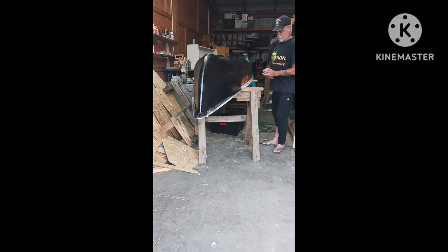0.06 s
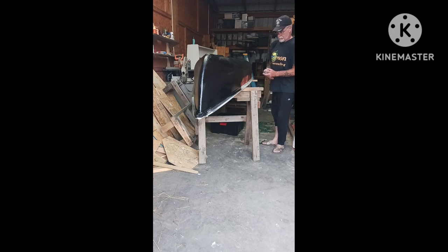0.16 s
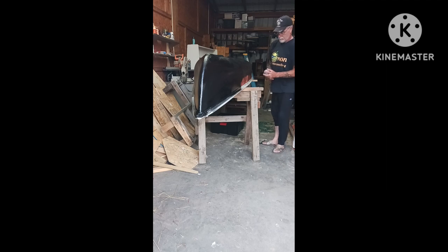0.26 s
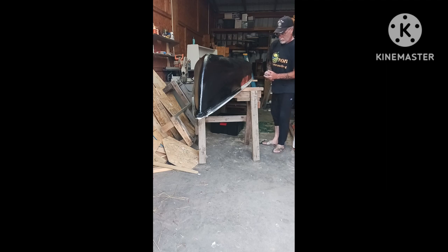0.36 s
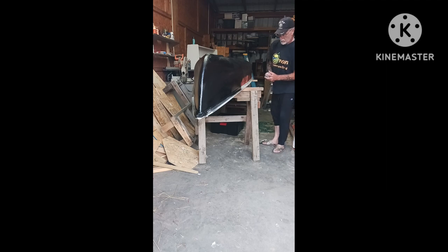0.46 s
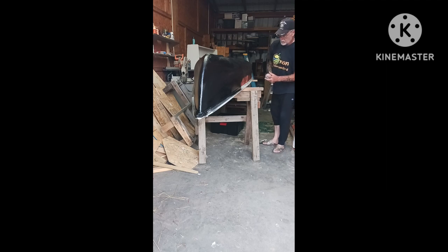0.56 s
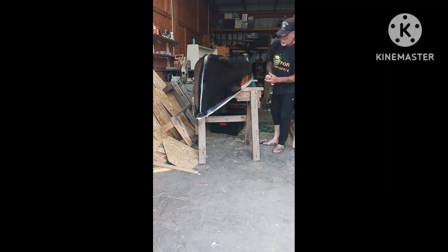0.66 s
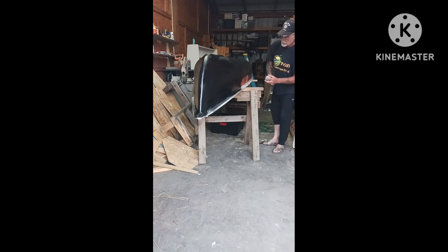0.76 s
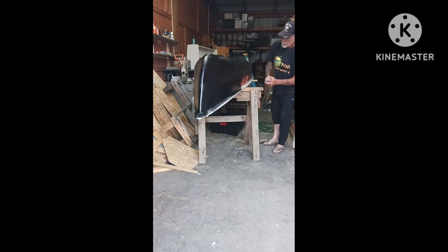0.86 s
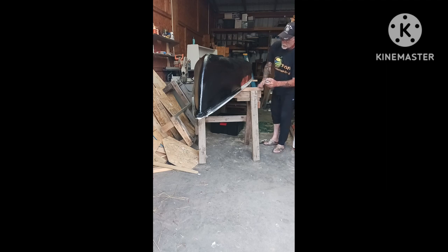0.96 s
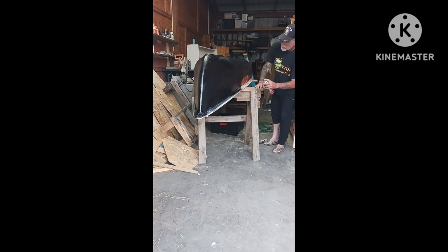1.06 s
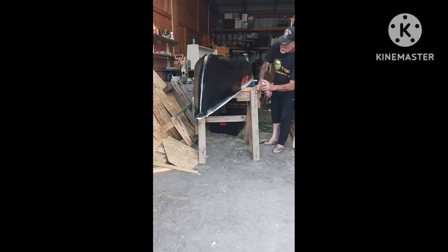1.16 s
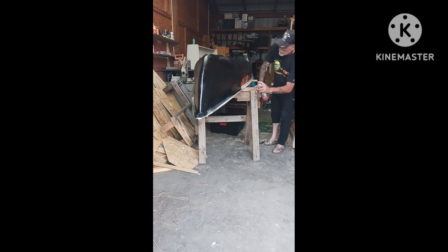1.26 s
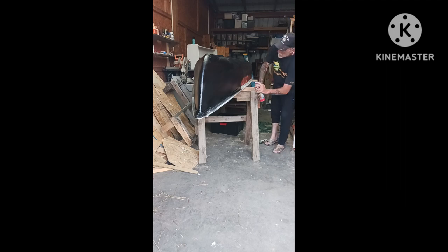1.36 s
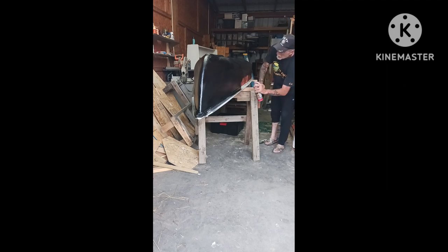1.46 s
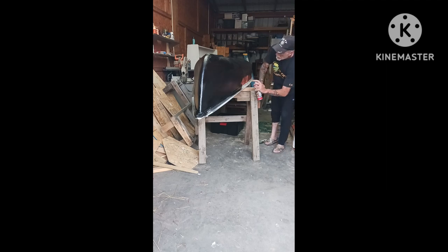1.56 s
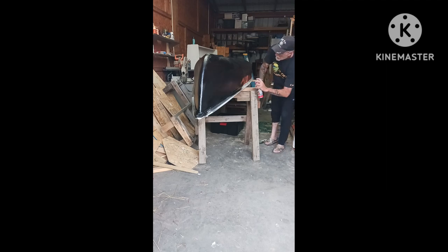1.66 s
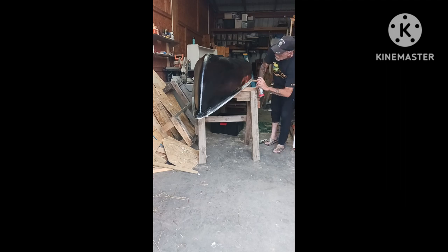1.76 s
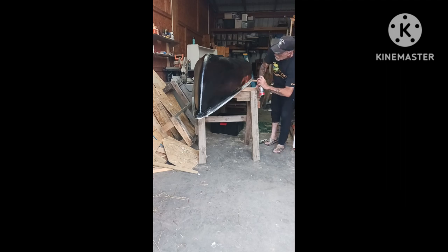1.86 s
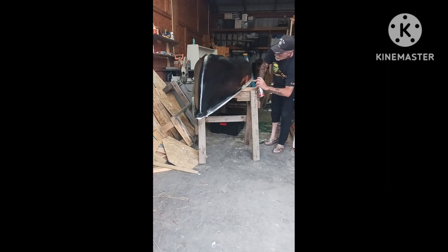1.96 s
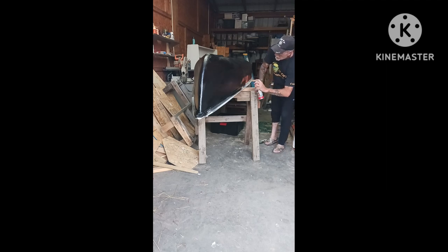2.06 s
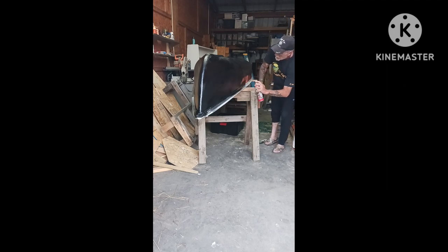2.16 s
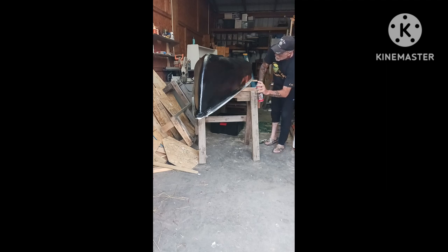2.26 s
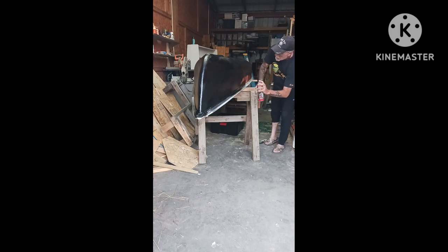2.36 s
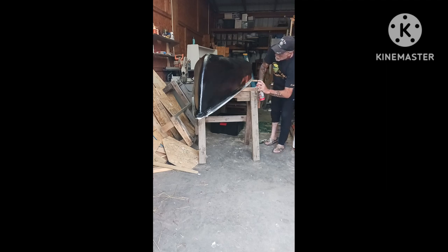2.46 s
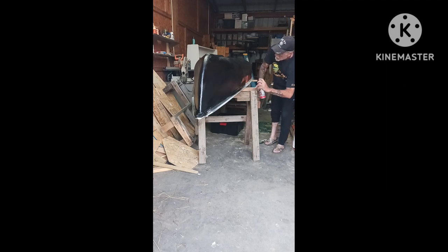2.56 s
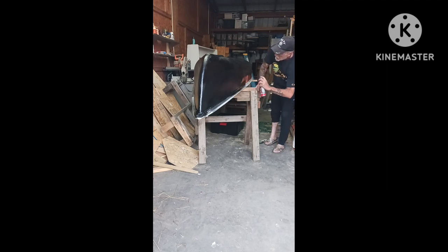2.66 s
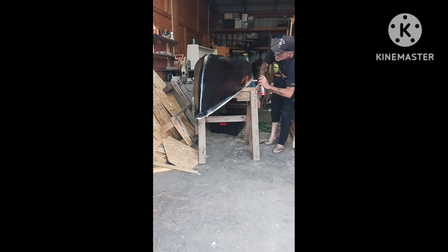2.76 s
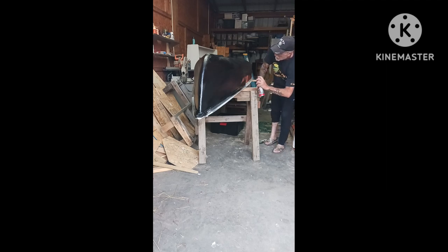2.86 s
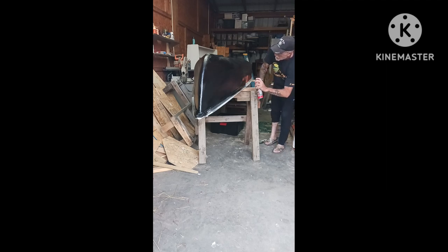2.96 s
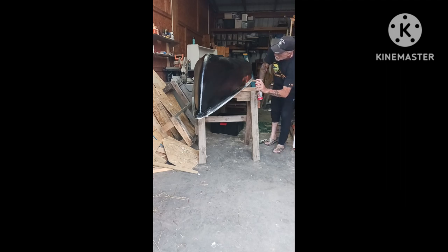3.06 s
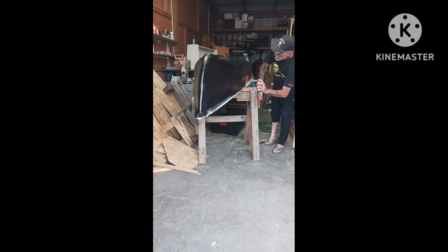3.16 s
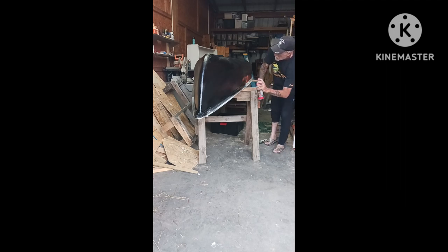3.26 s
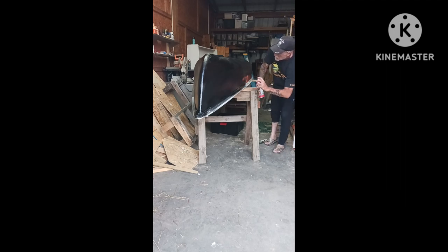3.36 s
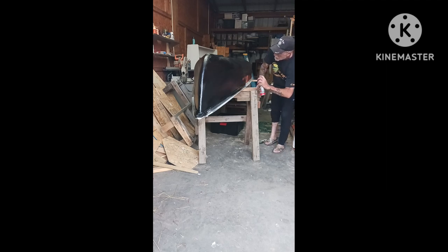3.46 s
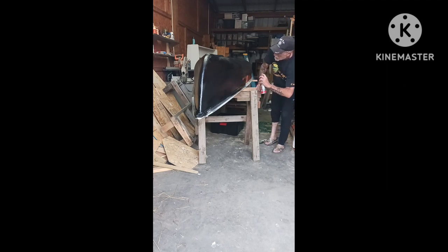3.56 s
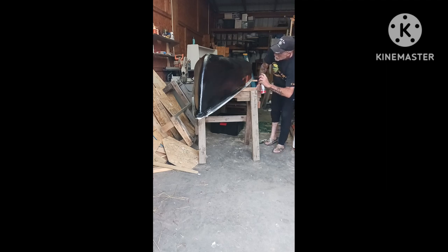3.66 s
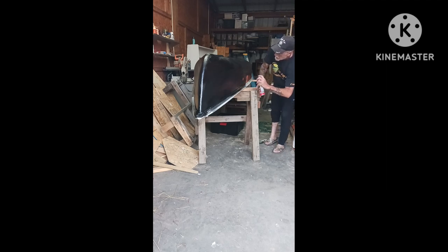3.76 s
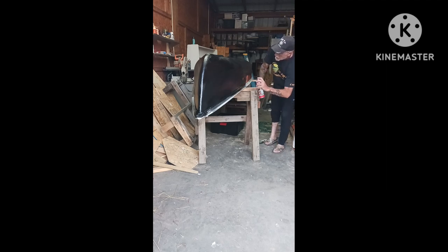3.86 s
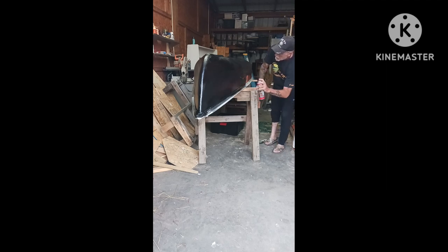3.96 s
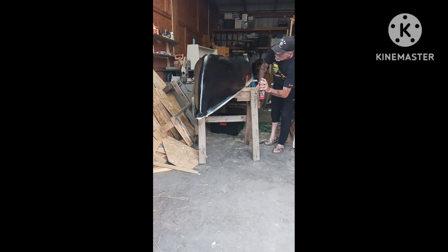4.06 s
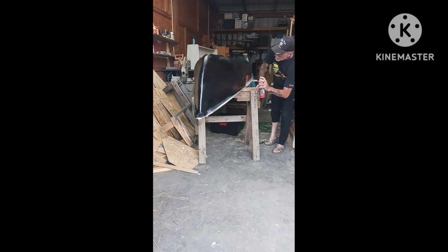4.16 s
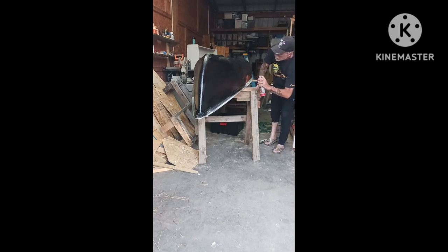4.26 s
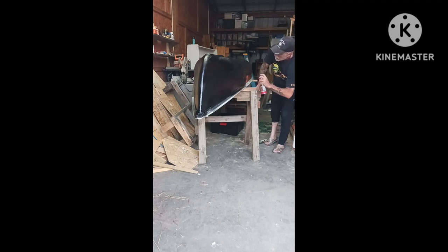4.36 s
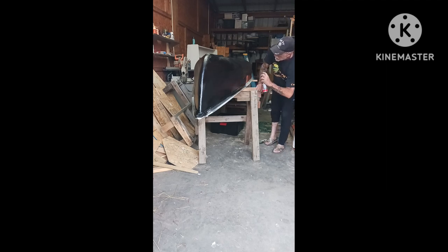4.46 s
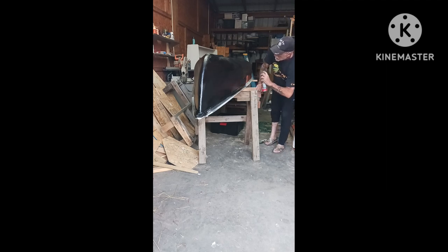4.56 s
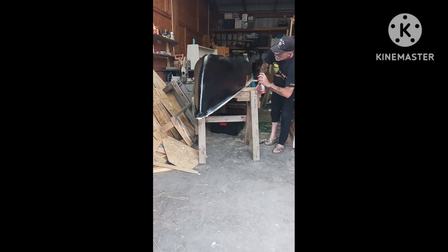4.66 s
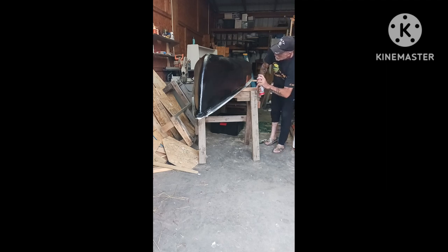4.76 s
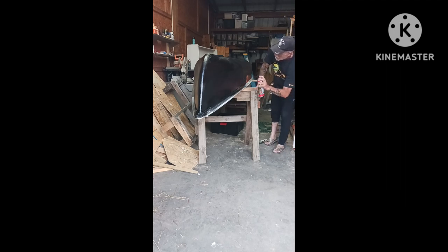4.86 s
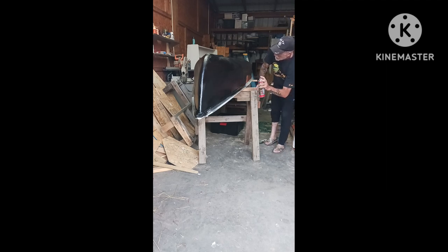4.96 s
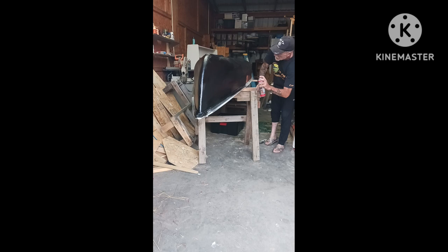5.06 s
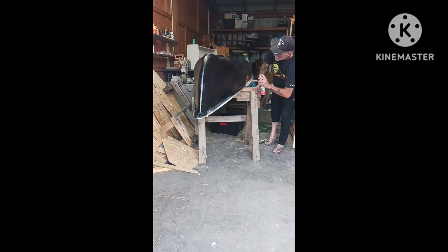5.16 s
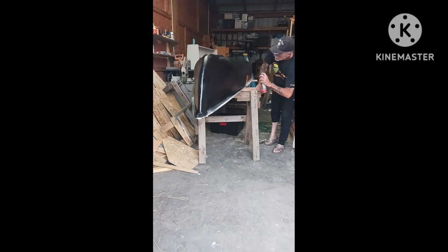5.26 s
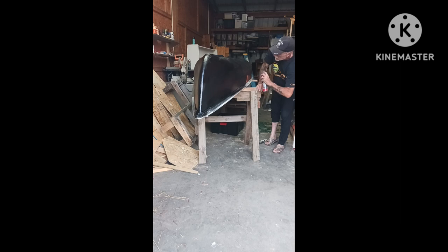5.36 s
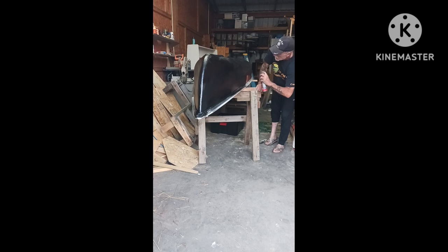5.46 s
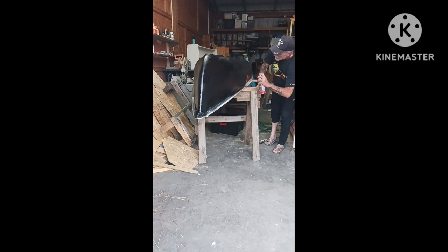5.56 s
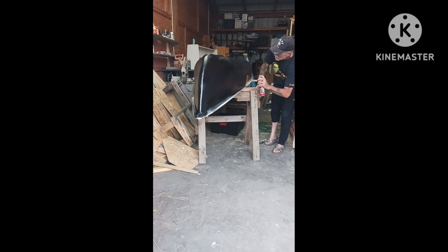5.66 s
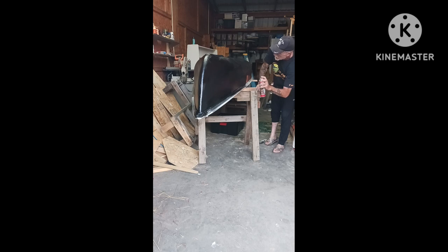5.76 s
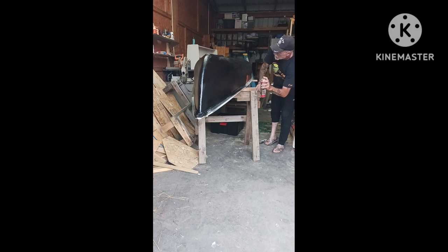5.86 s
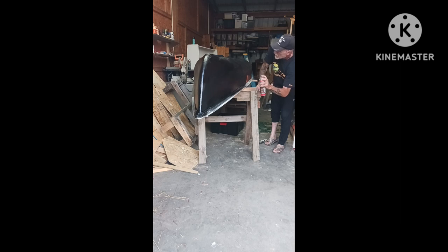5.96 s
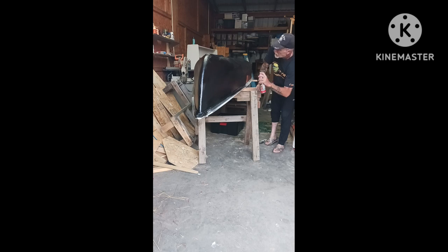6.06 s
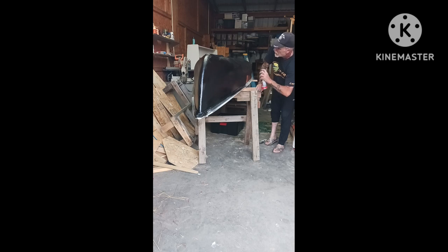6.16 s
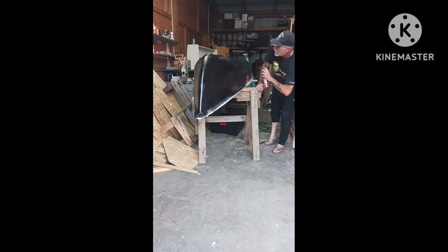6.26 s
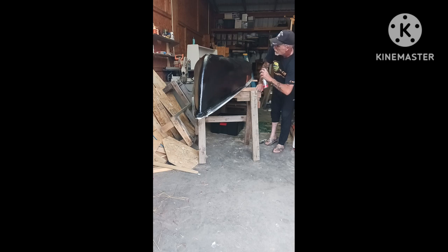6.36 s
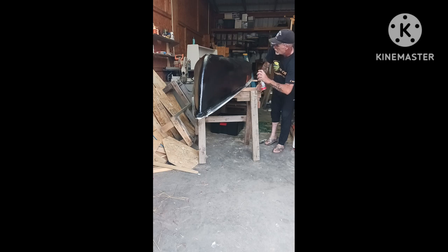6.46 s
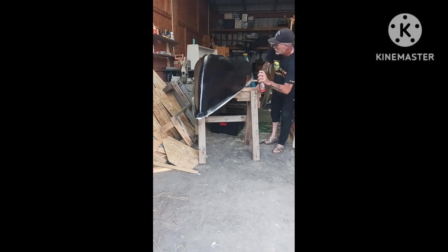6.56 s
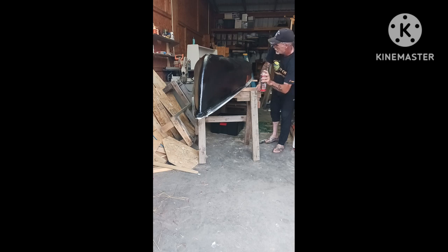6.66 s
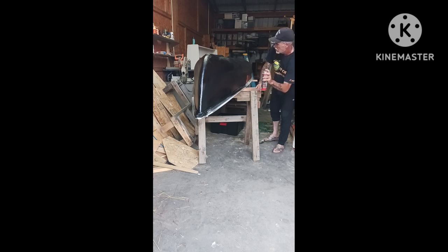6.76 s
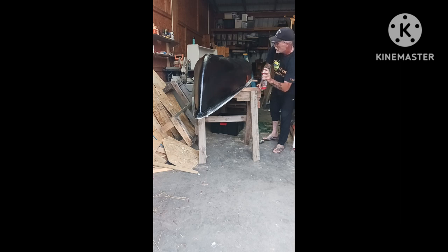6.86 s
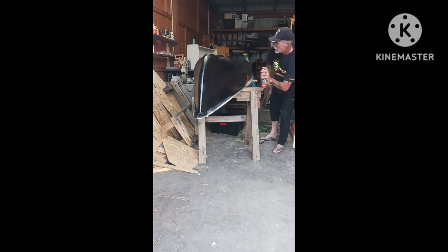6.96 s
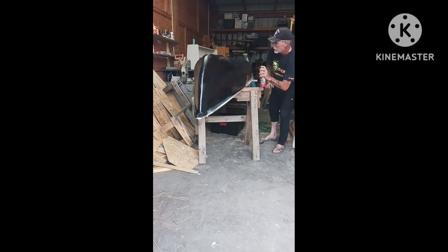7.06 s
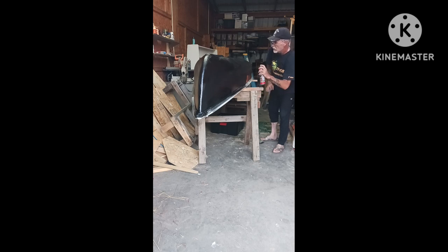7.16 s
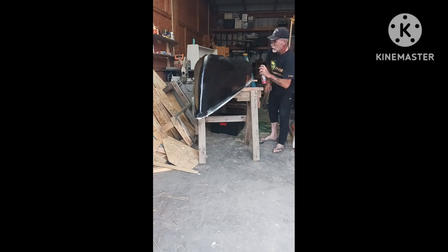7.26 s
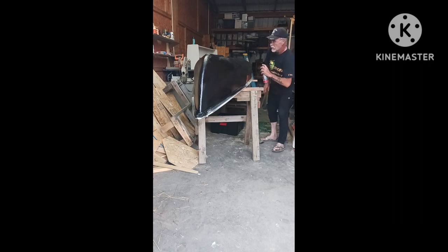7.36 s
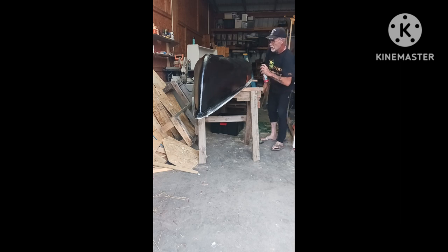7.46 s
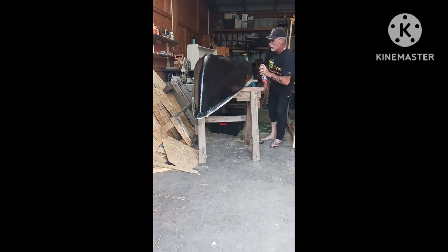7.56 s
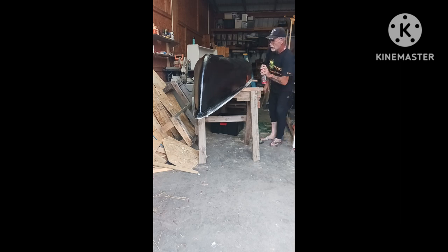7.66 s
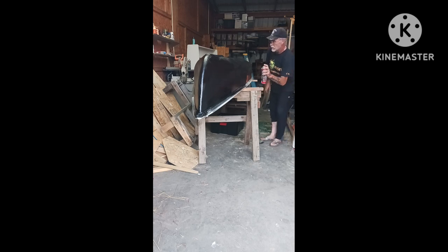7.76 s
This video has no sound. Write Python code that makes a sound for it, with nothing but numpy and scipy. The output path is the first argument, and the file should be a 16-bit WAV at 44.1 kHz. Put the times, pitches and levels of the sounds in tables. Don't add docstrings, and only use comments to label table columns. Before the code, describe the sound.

A timber workshop with a short, soft reverberation, heard in stereo from a few metres. At 0.1 s a sandal scuffs strongly on gritty concrete; from 0.5 to 1.1 s the sole drags quietly over sand, with dry little cracks. After a brief pause, an aerosol can starts at 1.5 s: a sharp-edged, very bright hiss lasting about 0.3 s, with the midrange rush of droplets hitting a hull. Bursts repeat about every 0.45 s, with clean gaps, alternating between strokes that start stronger and fade and strokes that grow. The rhythm runs until 6.7 s, pauses, then resumes at 7.1 and 7.5 s, with a faint scuff at 7.5 and a slower one at 7.7. Beneath everything, a far engine hums very low near 60 Hz, swelling unevenly and fuller around 1.6 s and after 5.5 s, with muffled traffic wash and faint airy room noise.

```python
import sys
import numpy as np
from scipy import signal
from scipy.fft import rfft, irfft, next_fast_len
from scipy.io import wavfile
from scipy.ndimage import uniform_filter1d, map_coordinates

SR = 44100
rng = np.random.default_rng(int(sys.argv[2]) if len(sys.argv) > 2 else 0)


def gain_from_db(level_db):
    decades = np.asarray(level_db, float) / 20
    return 10 ** decades


def file_out(sig):
    cols = np.atleast_2d(sig).T
    lim = np.clip(cols, -1, 1)
    pcm = np.round(lim * 32767).astype(np.int16)
    wavfile.write(sys.argv[1], SR, pcm)


N = 344862

# f/Hz, level/dB [per Hz]
AIR_SPECTRUM = [(20, -41), (42, -15), (64, -10.5), (129, -24), (433, -20), (620, -27.5), (1500, -28.5),
                (2200, -38), (2800, -32.5), (3500, -26.5), (6800, -25), (8300, -38), (11000, -55.5),
                (15500, -36)]
# f/Hz, coherence/1
AIR_COHERENCE = [(60, 0.71), (150, 1), (380, 0.99), (950, 0.5), (2380, 0.61), (5980, -0.33), (15000, -1.15)]
# f/Hz, level/dB
AIR_PORTS = [(60, 5), (130, 5), (290, 2), (640, 2.5), (1410, 4), (3100, 3.5), (6820, -5), (15000, 3)]
# f/Hz, level/dB [per Hz]
TRAFFIC_SPECTRUM = [(30, -40), (60, 3), (130, -2), (400, -15.5), (700, -28)]
# t/s [loudest], half width/s, level/dB, f/Hz [firing pitch]
ENGINE_SWELLS = [(0.08, .22, -53, 55.5), (.55, .05, -51.5, 57), (.76, .045, -49, 57.5),
                 (.95, .08, -54, 57.4), (1.12, .04, -54, 58), (1.36, .12, -57, 58.6),
                 (1.6, .085, -40, 58.7), (1.87, .05, -46, 59.7), (2.1, .07, -56, 59.3),
                 (2.4, .16, -58, 64.7), (2.67, .06, -52, 65.1), (3.01, .05, -53, 65.8),
                 (3.17, .04, -56, 65.4), (3.87, .05, -56, 58.8), (4.15, .14, -58, 59.5),
                 (4.43, .03, -53, 62.4), (4.92, .08, -52, 62.4), (5.13, .1, -48.5, 61.1),
                 (5.58, .1, -46, 59.7), (5.87, .19, -39.5, 59.6), (6.25, .22, -43, 60),
                 (6.64, .25, -39.5, 59.8), (7.1, .2, -46, 60), (7.39, .14, -42, 58.8),
                 (7.73, .05, -47, 59.5)]
# f/Hz, bandwidth/Hz, level/dB
MACHINE_TONES = [(137.2, 6.5, -68.5), (184, 3.2, -72)]
# t/s [loudest], rise/s [per 20 dB], fall/s [per 20 dB], level/dB
SCUFFS = [
    (.126, .06, .04, -37.5),
    (7.485, .03, .06, -50),
    (7.716, .12, .06, -44.5),
]
# t/s [loudest], rise/s [per 20 dB], fall/s [per 20 dB], level/dB
DRAGS = [
    (.5, .03, .03, -67),
    (.547, .006, .012, -52),
    (.615, .09, .6, -60.5),
    (.882, .35, .17, -57),
    (.974, .012, .33, -58.5),
]
# t/s, level/dB [peak], f/Hz [ring]
GRIT_CRACKS = [
    (0.4953, -47, 3640),
    (0.5452, -40, 3660),
    (0.607, -45, 3460),
    (0.6594, -40, 3320),
    (0.8094, -41, 3650),
    (0.8748, -37.5, 3150),
    (0.9074, -44, 3540),
    (0.9738, -38.5, 3960),
    (1.064, -44, 3470),
]
# f/Hz, level/dB [per Hz]
SOLE_SPECTRUM = [(600, -60), (950, -35), (1200, -16), (1850, -10), (2650, -6.5), (3500, -10), (5000, -15),
                 (7300, -16.5), (11000, -16), (15500, -20.5)]
# f/Hz, level/dB [per Hz]
DRAG_SPECTRUM = [(530, -46), (900, -24), (1230, -6), (1610, -7), (3340, 0), (4710, -8.5), (10600, -14.5),
                 (13400, -12), (15500, -24)]
# t/s [start], length/s, level/dB [hiss at first],
# level/dB [hiss after the wrist has turned], f/Hz [brightest lobe of the jet]
PRESSES = [(1.535, .327, -34.5, -40, 13600), (1.998, .289, -41.5, -38.5, 13500),
           (2.469, .295, -39.5, -40, 14200), (2.9, .27, -42, -38, 13700), (3.325, .297, -39, -40.5, 13900),
           (3.769, .284, -41.5, -38, 14100), (4.232, .301, -38.5, -41.5, 13900),
           (4.673, .273, -42, -38.5, 13700), (5.125, .295, -37.5, -40.5, 13500),
           (5.568, .279, -41, -37.5, 13600), (6.011, .268, -37.5, -40.5, 13500),
           (6.433, .239, -42, -39, 13300), (7.062, .332, -39, -41.5, 13000),
           (7.532, .265, -42.5, -39.5, 13400)]
# f/Hz, level/dB [per Hz]
JET_SPECTRUM = [(4500, -34), (5800, -8), (6900, -5.5), (8500, -6.5), (10000, -8), (11500, -2), (13200, 2.5),
                (14200, 0), (15400, 4), (17000, 0.5)]
# f/Hz, level/dB [per Hz]
SPLASH_SPECTRUM = [(500, -37), (1000, -25), (1800, -14), (2250, -13), (2600, -7.5), (3000, -6.5),
                   (3600, -0.5), (4300, -4.5), (5100, -10), (5600, -15.5), (7000, -17)]
# f/Hz, t60/s
SHED_T60 = [(1000, 0.5), (3500, 0.28), (8000, 0.24), (14000, 0.2)]
# f/Hz, level/dB
NEAR_PORTS = [(700, 10), (1500, 0.5), (3300, -1.5), (5200, -0.5), (5800, -11), (6800, -5), (7600, -0.5),
              (10000, 6.5), (11700, 4.5), (13200, 3.5), (14200, 0), (15500, 5)]


def evened(x):
    return x / np.sqrt(np.mean(x ** 2) + 1e-20)


def read_table(points, hz):
    f, value = np.transpose(points)
    return np.interp(np.log(hz + 1), np.log(f + 1), value)


def colour(x, points, share=1):
    size = next_fast_len(x.shape[-1])
    response_db = read_table(points, np.fft.rfftfreq(size, 1 / SR))
    return irfft(rfft(x, size) * gain_from_db(share * response_db), size)[..., :x.shape[-1]]


def wander(hz):
    low_pass = signal.butter(2, hz, fs=SR, output="sos")
    return evened(signal.sosfilt(low_pass, rng.standard_normal(N)))


def air():
    wash_db = -54.5
    frames, hz = N // 256 + 5, np.fft.rfftfreq(1024, 1 / SR)
    a, b, c, d, patches = rng.standard_normal((frames, 513, 5)).T
    patches = evened(uniform_filter1d(uniform_filter1d(patches, 10, 0), 16, 1))
    same = np.clip(read_table(AIR_COHERENCE, hz), -1, 1)[:, None]
    left = a + 1j * b
    right = same * left + np.sqrt(1 - same ** 2) * (c + 1j * d)
    z = np.array([left, right]) * gain_from_db(1.05 * patches)
    noise = signal.istft(z, nperseg=1024, noverlap=768)[1][:, :N]
    wash = gain_from_db(wash_db) * evened(colour(noise, AIR_SPECTRUM))
    return np.array([colour(wash[0], AIR_PORTS, 0.83), colour(wash[1], AIR_PORTS, -0.73)])


def engine_db():
    lull_db = -73
    t = np.linspace(0, N / SR, num=2000)
    power = sum(gain_from_db(db) ** 2 * np.exp(-((t - s) / width) ** 2) for s, width, db, _ in ENGINE_SWELLS)
    return np.interp(np.arange(N) / SR, t, 10 * np.log10(power + gain_from_db(lull_db) ** 2))


def traffic():
    level_db, follows, drift_db = -60.5, .33, .6
    wash = rng.standard_normal(N) + 0.56 * rng.standard_normal((2, N))
    wash = evened(colour(wash, TRAFFIC_SPECTRUM))
    return gain_from_db(level_db + follows * (engine_db() + 55) + drift_db * wander(1.5)) * wash


def drone():
    s, _, _, hz = np.transpose(ENGINE_SWELLS)
    t = np.arange(N) / SR
    turns = np.cumsum(np.interp(t, s, hz) + 0.58 * wander(3.15)) / SR
    level = gain_from_db(engine_db())
    out = np.sqrt(2) * level * gain_from_db(0.44 * wander(6.9)) * np.sin(2 * np.pi * turns)
    for tone_hz, width_hz, tone_db in MACHINE_TONES:
        in_phase = wander(width_hz) * np.cos(2 * np.pi * tone_hz * t)
        quadrature = wander(width_hz) * np.sin(2 * np.pi * tone_hz * t)
        out += gain_from_db(tone_db) * (in_phase + quadrature)
    return out + gain_from_db(-8.5) * np.outer([1, -1], level * np.cos(2 * np.pi * turns))


def ports(x, lag_s):
    return np.array([x, map_coordinates(x, [np.arange(N) - lag_s * SR], order=3)])


def slides(rows):
    t = np.arange(N) / SR
    power = sum(gain_from_db(db - 20 * np.maximum((s - t) / rise, (t - s) / fall)) ** 2 for s, rise, fall, db in rows)
    return np.sqrt(power)


def sandals():
    sizes = gain_from_db(3.0 * np.minimum(rng.exponential(1, N), 5))
    struck = rng.random(N) < 2500 / SR
    grains = sizes * struck * rng.choice([-1, 1], N)
    grains = evened(grains) + 1.7 * rng.standard_normal(N)
    scuff = slides(SCUFFS) * evened(colour(grains, SOLE_SPECTRUM))
    drag = slides(DRAGS) * evened(colour(grains, DRAG_SPECTRUM))
    source = gain_from_db(5.5 + 0.92 * wander(46)) * (scuff + drag)
    t = np.arange(400) / SR
    for s, peak_db, hz in GRIT_CRACKS:
        crack = np.diff(rng.standard_normal(len(t) + 1)) * gain_from_db(-60 * t / .006)
        ring = np.sin(2 * np.pi * hz * t) * gain_from_db(-60 * t / 0.011)
        source[round(s * SR):][:len(t)] += gain_from_db(peak_db) * (ring + crack)
    return gain_from_db(-1.0) * ports(source, .00004), gain_from_db(-3.5) * source


def shed(x, count=4, drift_hz=6.9):
    taps = np.zeros((count, 2, SR // 4))
    at = np.arange(160, SR // 4 - 12, 12)
    at = at + rng.integers(0, 12, (count, 2, len(at)))
    np.put_along_axis(taps, at, rng.choice([-1., 1.], at.shape), 2)
    hz, t, z = signal.stft(taps, SR, nperseg=128)
    z *= gain_from_db(-60 * t / read_table(SHED_T60, hz)[:, None])
    energy = (abs(z) ** 2).sum(3, keepdims=True)
    z /= np.sqrt(uniform_filter1d(energy, size=9, axis=2))
    tails = signal.istft(z, SR, nperseg=128)[1]
    shares = np.array([wander(drift_hz) for _ in range(count)])
    fed = x * shares / np.linalg.norm(shares, axis=0)
    return signal.oaconvolve(fed[:, None], tails / np.linalg.norm(tails[0, 0]), axes=2).sum(0)[:, :N]


def presses():
    open_s, close_s = .011, .01
    turn_s = .2
    t = np.arange(N) / SR
    rows = np.array(PRESSES)
    start, length, first_db, last_db, lobe_hz = rows[np.maximum(np.searchsorted(rows[:, 0], t) - 1, 0)].T
    since = np.maximum(t - start, 0)
    along = np.clip(since / length, 0, 1)
    opening = np.clip(since / open_s, 0, 1)
    closing = np.clip(1 - (since - length) / close_s, 0, 1)
    valve = (opening * closing) ** 2
    aim_db = first_db + (last_db - first_db) * np.sin(np.pi / 2 * np.minimum(since / turn_s, 1)) ** 2
    spurt_db = 1.0 * np.exp(-since / .015)
    close_pass_db = .8 * np.sin(np.pi * along)
    splash_db = -47.7 + .35 * (aim_db + 40) + close_pass_db + spurt_db
    lobe_hz = lobe_hz - 120 * (aim_db - (first_db + last_db) / 2) + 250 * wander(5)
    pan_first_db, pan_last_db, pan_drift_db = 1.5, 4.5, 1.5
    pan_db = pan_first_db + (pan_last_db - pan_first_db) * along + pan_drift_db * wander(6)
    return valve, aim_db + spurt_db, splash_db, pan_db, lobe_hz


def resonate(x, hz, width):
    turn = np.exp(2j * np.pi * np.cumsum(hz) / SR)
    r = np.exp(-np.pi * width / SR)
    return 2 * (turn * signal.lfilter([1 - r], [1, -r], x / turn)).real


def spray():
    valve, hiss_db, splash_db, pan_db, lobe_hz = presses()
    sputter_db = 0.61 * wander(280) + 1.0 * wander(47)
    jet = colour(rng.standard_normal(N), JET_SPECTRUM)
    jet = evened(jet + 0.86 * resonate(jet, lobe_hz, 1140)) * gain_from_db(sputter_db)
    splash = evened(colour(rng.standard_normal(N), SPLASH_SPECTRUM))
    splash = splash * gain_from_db(splash_db - hiss_db + 3.5 + 1.5 * sputter_db)
    jet, splash = valve * gain_from_db(hiss_db + 2.0) * np.array([jet, splash])
    lag_s = 0.00018 + .000012 * wander(4.7)
    near = gain_from_db(-3.5) * jet + gain_from_db(-3.5) * splash
    near = ports(near + gain_from_db(-25) * np.roll(near, 100), lag_s)
    send = gain_from_db(2.0) * jet + gain_from_db(-1.5) * splash
    return near * gain_from_db(np.outer([.5, -.5], pan_db - 3.0)), send


def scene():
    can, can_send = spray()
    feet, feet_send = sandals()
    near = can + feet + shed(can_send + feet_send)
    near = np.array([colour(near[0], NEAR_PORTS, 0.65), colour(near[1], NEAR_PORTS, -0.39)])
    return near + drone() + traffic() + air()


def band_limit(x):
    return signal.sosfilt(signal.butter(12, 15830, fs=SR, output="sos"), x)


def record(dry):
    edge = signal.firwin(801, 15500, window=("kaiser", 9), fs=SR)
    mix = signal.oaconvolve(dry, edge[None], "same")
    return band_limit(mix)


dry = scene()
out = record(dry)
file_out(out)
```